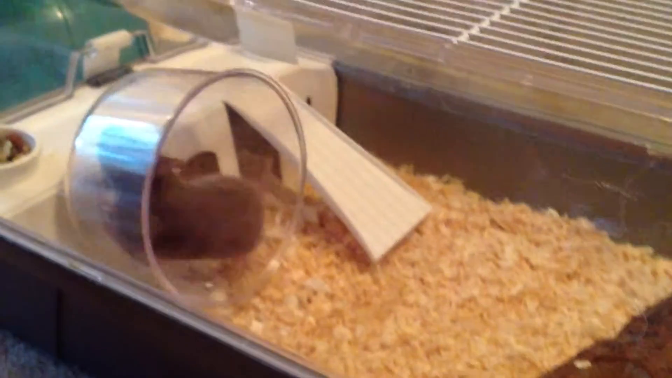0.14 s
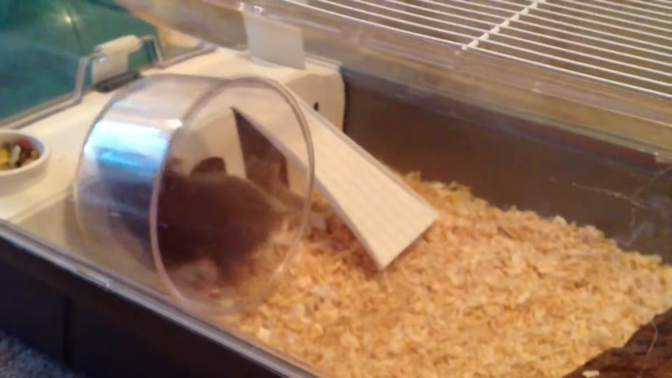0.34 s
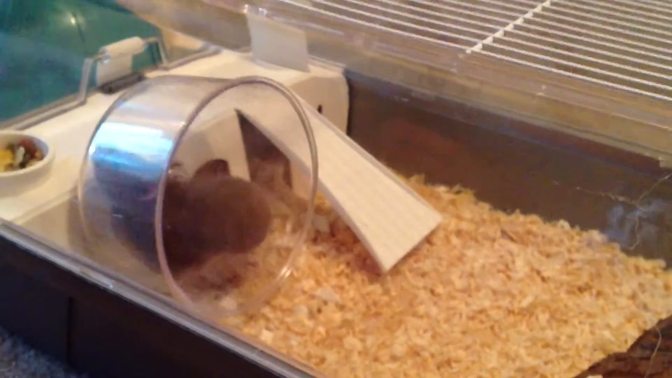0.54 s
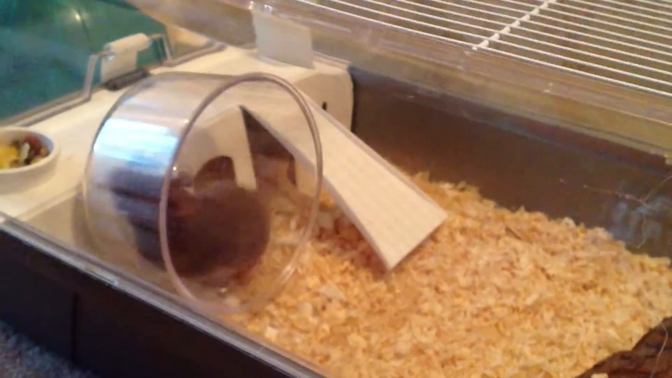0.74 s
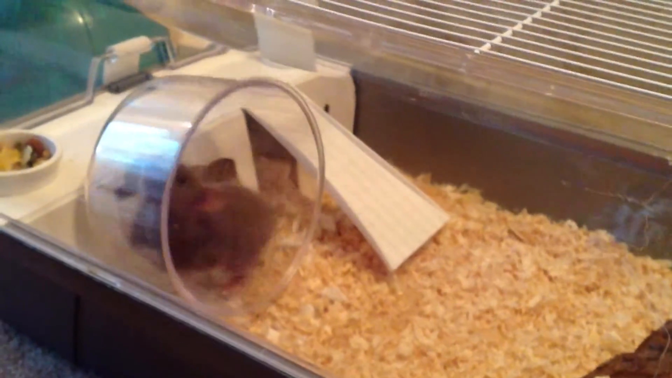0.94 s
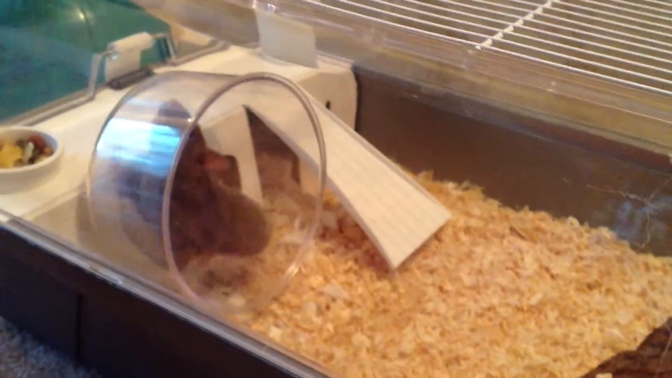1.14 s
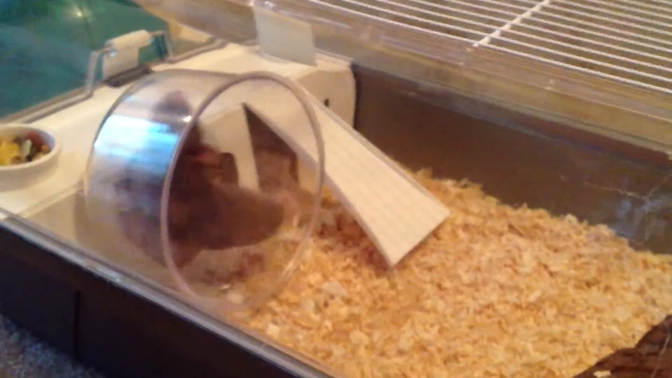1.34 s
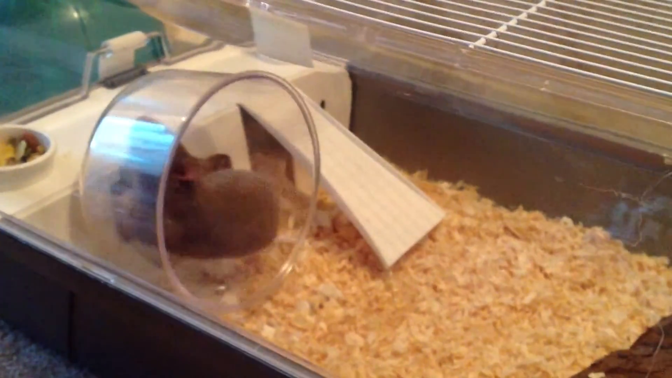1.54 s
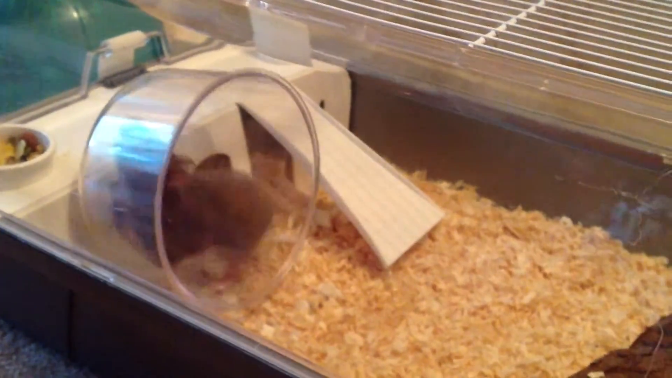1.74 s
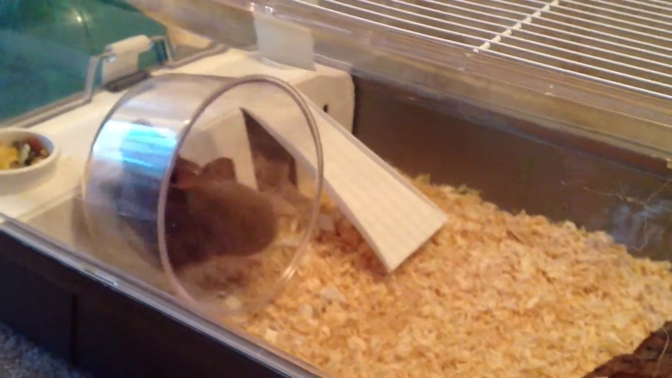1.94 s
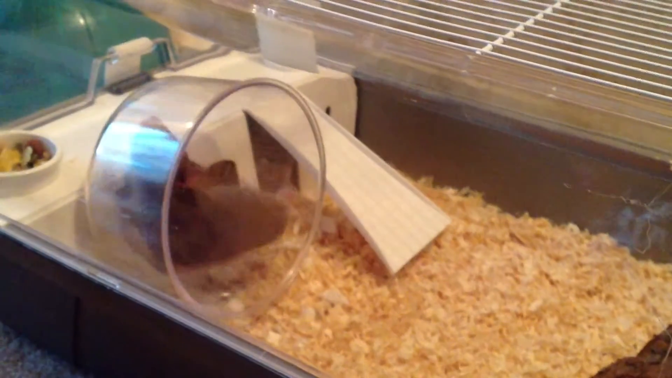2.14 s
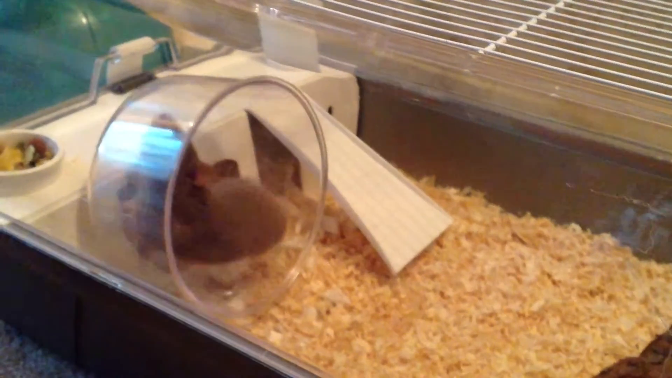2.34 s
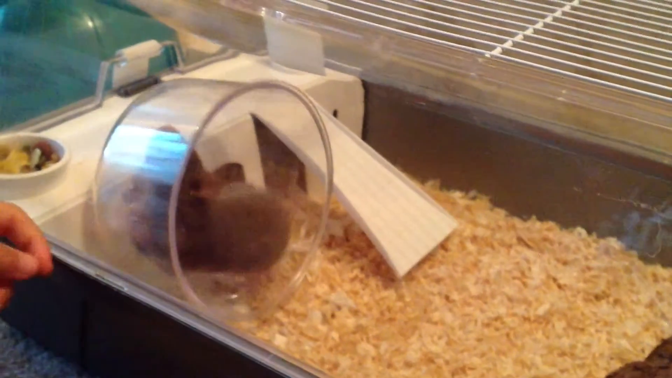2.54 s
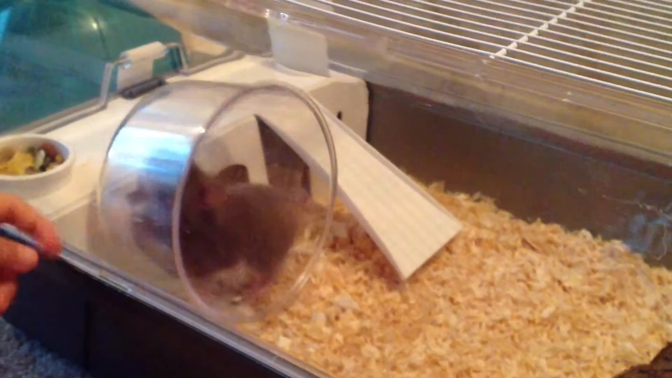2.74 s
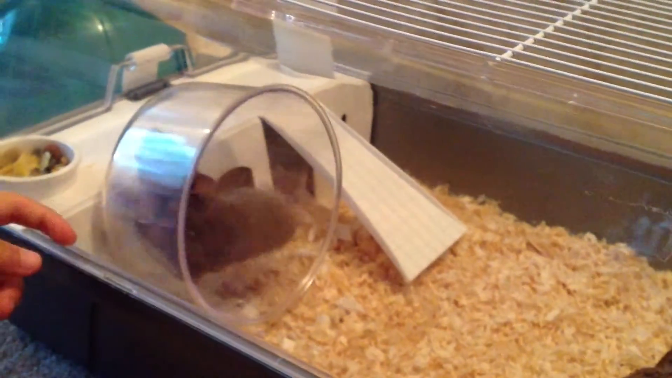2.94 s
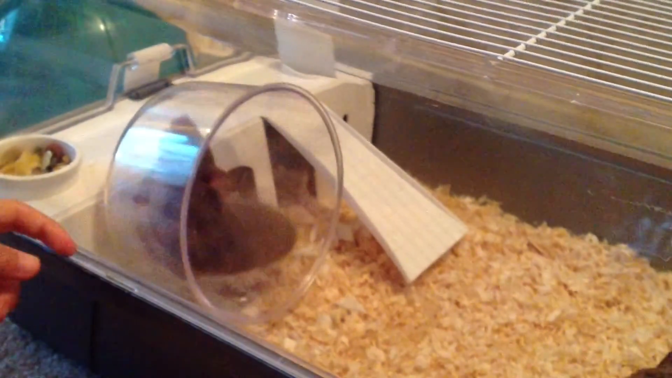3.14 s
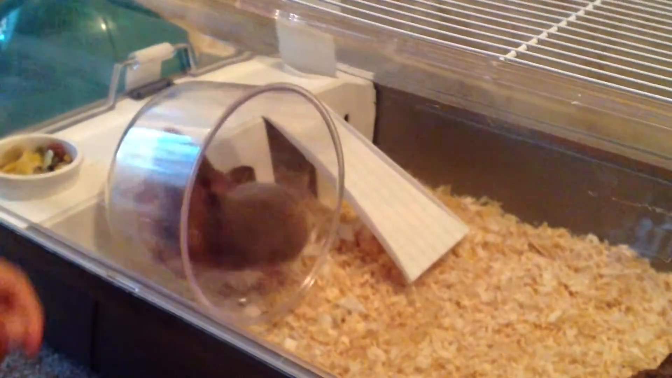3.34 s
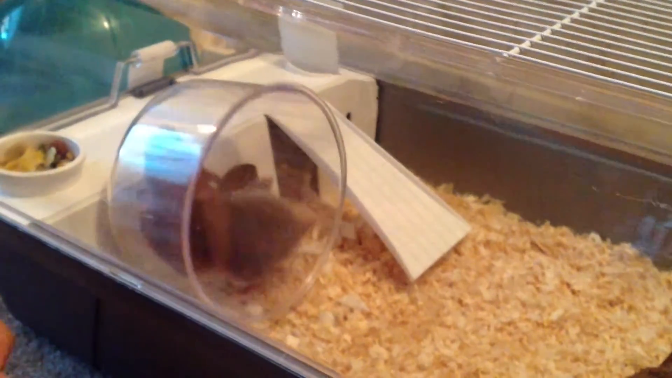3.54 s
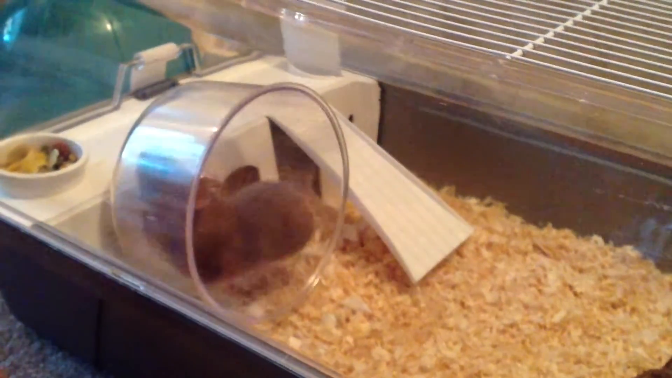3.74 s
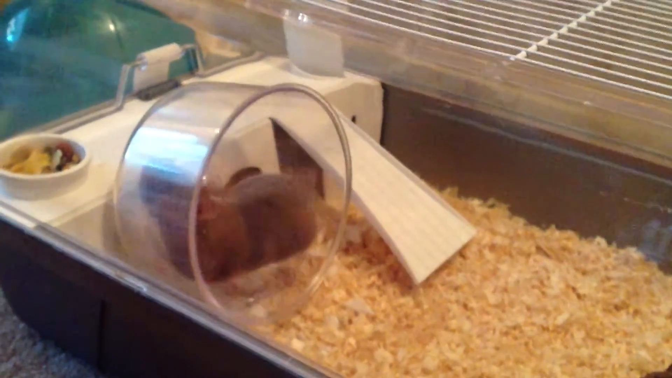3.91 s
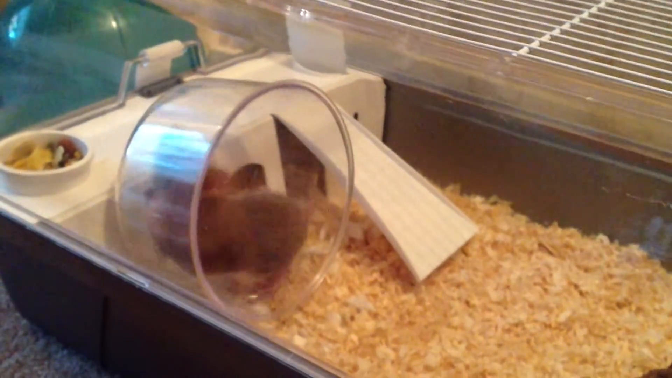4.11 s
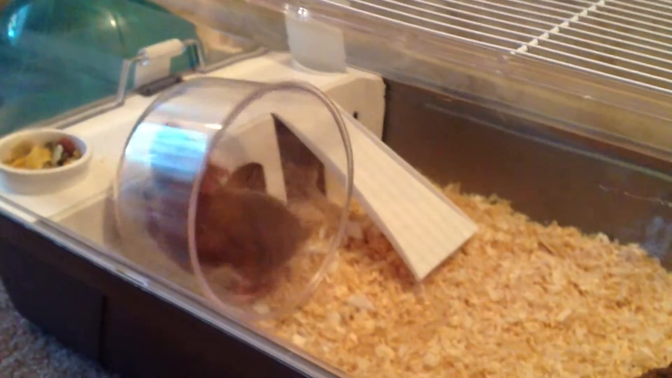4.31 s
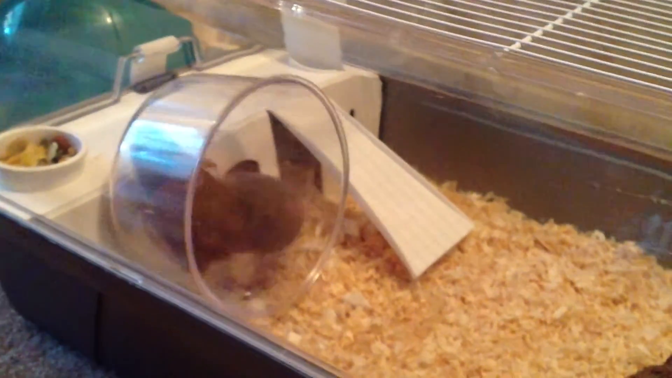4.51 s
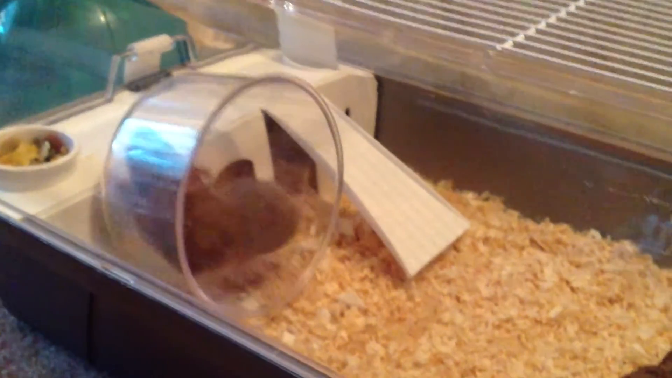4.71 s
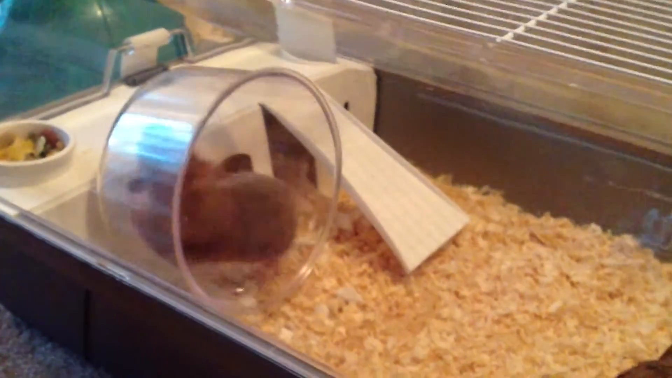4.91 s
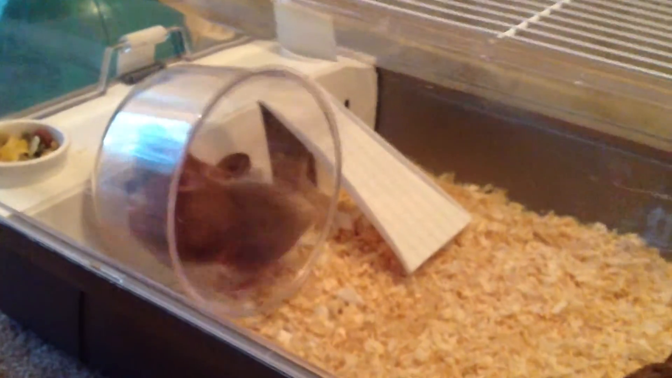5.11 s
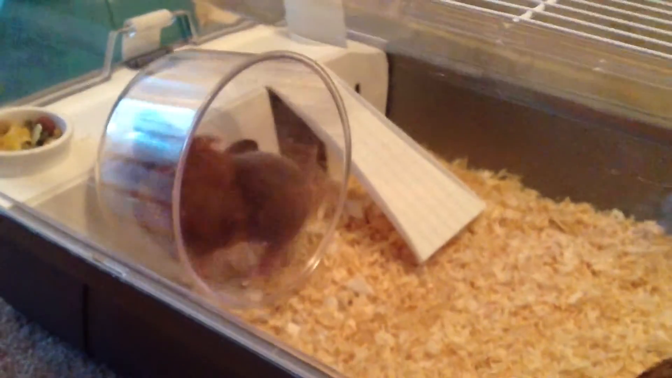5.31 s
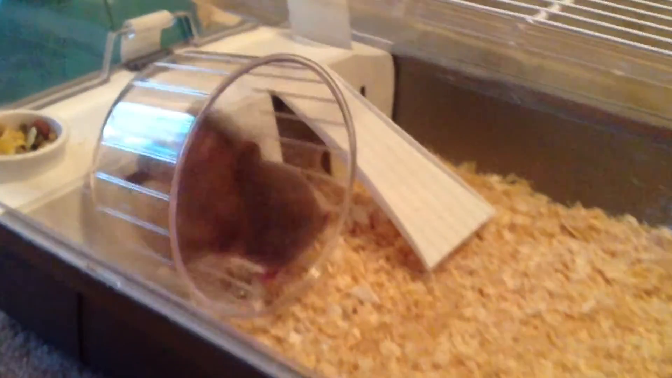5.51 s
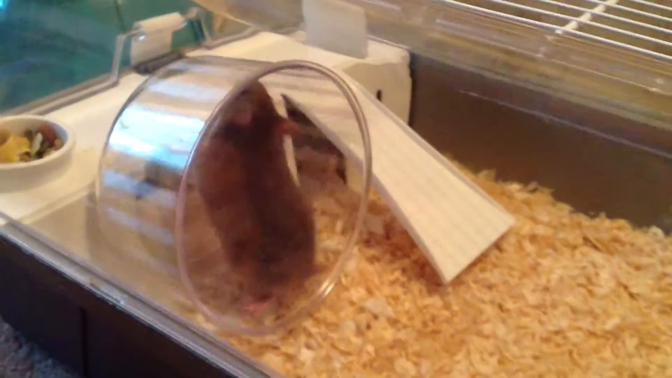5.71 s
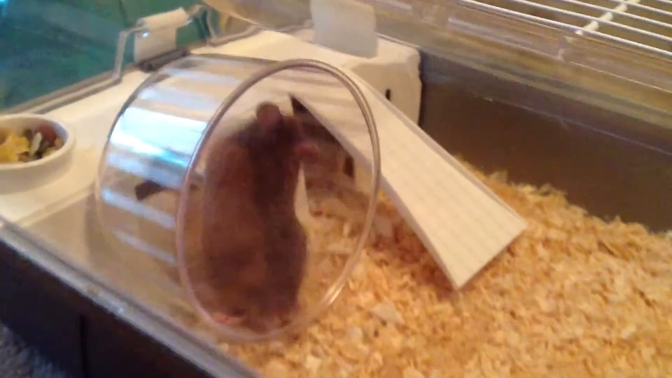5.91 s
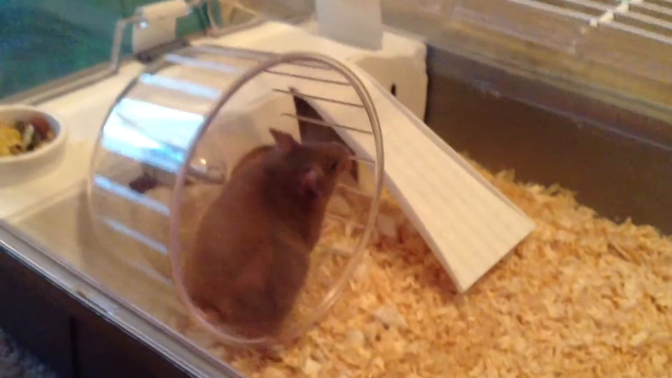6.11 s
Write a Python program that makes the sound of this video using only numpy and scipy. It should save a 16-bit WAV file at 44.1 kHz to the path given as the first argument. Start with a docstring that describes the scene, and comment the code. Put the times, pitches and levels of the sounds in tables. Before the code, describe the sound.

Quick, uneven muffled paw thumps drum inside a rolling plastic wheel, clicking and squeaking at its axle, then stop, leaving quiet room noise.

```python
"""Hamster in a running wheel

A hamster runs in a plastic wheel in a cage in a quiet room; the last footfall comes near 5.4 s.
Paws thump (sinking pulses plus drum modes) and scuff (shaped noise); the turning drum rumbles.
The axle taps, clacks (noise and hub modes) and chirps (gliding stick-slip tones); claws, fur and shavings
tick and rustle. Behind: a steady noise floor, a hiss that swells and fades, a slightly wavering hum."""
import sys
import numpy as np
from scipy import signal
from scipy.fft import rfft, irfft, next_fast_len
from scipy.io import wavfile

SR = 44100
rng = np.random.default_rng(int(sys.argv[2]) if len(sys.argv) > 2 else 0)


def store_wav(level_fs):
    """Save 16-bit WAV to argv[1]."""
    pcm = np.round(np.clip(np.atleast_2d(level_fs), -1, 1) * 32767)
    wavfile.write(sys.argv[1], SR, pcm.T.astype(np.int16))


N = 271656
TIME = np.arange(N) / SR


def amp(db):
    """Linear gain of a level in dB."""
    return 10 ** (np.asarray(db) / 20)


def evened(x):
    """Scale to rms 1."""
    return x / np.sqrt(np.mean(x ** 2) + 1e-20)


def read(points, hz):
    """Interpolate rows of (f/Hz, value) over log frequency."""
    f, value = np.transpose(points)
    return np.interp(np.log(hz + 1), np.log(f + 1), value)


def curve(rows):
    """Gain over time from rows of (t/s, level/dB)."""
    return amp(np.interp(TIME, *np.transpose(rows)))


def add(mix, s, sound):
    """Mix a sound in from time s, cropped to the scene."""
    start = round(s * SR)
    part = mix[max(start, 0):][:len(sound) + min(start, 0)]
    part += sound[max(-start, 0):][:len(part)]


def noise(gain, size=N):
    """Noise of rms 1 whose spectrum is gain(f)."""
    full = next_fast_len(size)
    spectrum = rfft(rng.standard_normal(full)) * gain(np.fft.rfftfreq(full, 1 / SR))
    return evened(irfft(spectrum, full)[:size])


def band(hz, octaves, size=16384):
    """Noise of rms 1 in a bell-shaped band; octaves is its standard deviation."""
    return noise(lambda f: np.exp(-.5 * (np.log2((f + 1) / hz) / octaves) ** 2), size)


def drift(hz):
    """Slow random fluctuation of rms 1, lowpassed at hz."""
    return noise(lambda f: 1 / (1 + (f / hz) ** 4))


def bell(t, length):
    """Smooth swell around t = 0, down to 1/e^2 at +-length."""
    return np.exp(-np.minimum(2 * (t / length) ** 2, 20))


def ringing(modes, t):
    """Sum of decaying modes in random phases."""
    phases = np.exp(2j * np.pi * rng.random(len(modes)))
    decays = np.array([amp(db - 60 * np.maximum(t, 0) / t60) * np.exp(2j * np.pi * hz * t)
                       for hz, db, t60 in modes])
    return (phases @ decays).real


# modes of the drum on its stand: f/Hz, relative level/dB, t60/s
DRUM_MODES = [(122, 3, 0.22), (146.9, 7, 0.53), (176.3, 8.5, 0.28), (207.25, 9, 0.27), (244.5, -10.5, 0.31),
              (281, -1.5, 0.27), (378.4, -6, 0.26), (447, -23, 0.23)]
# paw landings in uneven clusters: t/s, level/dB, f/Hz, length/s
FOOTFALLS = [(0.038, -43.5, 179, 0.012), (0.066, -45, 180, 0.011), (0.146, -40.5, 200, 0.0088),
             (0.3, -55, 203, 0.014), (0.443, -40, 183, 0.013), (0.459, -41, 191, 0.0041),
             (0.492, -45, 226, 0.033), (0.52, -40.5, 184, 0.013), (0.543, -43, 203, 0.0069),
             (0.564, -39.5, 177, 0.012), (0.605, -50.5, 168, 0.014), (0.652, -47.5, 164, 0.014),
             (0.693, -40.5, 203, 0.017), (0.715, -34.5, 189, 0.01), (0.758, -41.5, 202, 0.031),
             (0.82, -41.5, 160, 0.012), (0.843, -39, 180, 0.011), (0.875, -48.5, 180, 0.014),
             (1.006, -36.5, 206, 0.012), (1.042, -46.5, 175, 0.008), (1.29, -34, 184, 0.0069),
             (1.313, -43.5, 181, 0.008), (1.477, -38, 191, 0.02), (1.497, -34.5, 186, 0.01),
             (1.517, -36.5, 175, 0.016), (1.551, -30.5, 182, 0.0072), (1.576, -35, 187, 0.005),
             (1.6, -40, 166, 0.0078), (1.745, -34.5, 187, 0.0064), (1.772, -35, 175, 0.011),
             (1.794, -37, 158, 0.014), (1.837, -31.5, 190, 0.0064), (1.866, -41, 184, 0.032),
             (1.894, -41, 180, 0.0082), (1.921, -40.5, 174, 0.015), (1.976, -37, 208, 0.01),
             (2.0, -45, 171, 0.019), (2.036, -41.5, 170, 0.011), (2.077, -30, 205, 0.014),
             (2.116, -51, 190, 0.028), (2.272, -45, 205, 0.017), (2.329, -32.5, 201, 0.0089),
             (2.365, -47, 172, 0.02), (2.41, -53, 160, 0.031), (2.586, -27.5, 203.5, 0.009),
             (2.62, -33, 172, 0.019), (2.65, -43, 174, 0.0076), (2.75, -42.5, 210, 0.0057),
             (2.783, -44, 198, 0.0082), (2.815, -33.5, 203, 0.013), (2.892, -37.5, 191, 0.0081),
             (3.0, -38.5, 196, 0.0069), (3.021, -36, 200, 0.022), (3.059, -39, 200, 0.014),
             (3.097, -32, 214, 0.007), (3.161, -39.5, 180, 0.0086), (3.274, -37, 186, 0.014),
             (3.334, -35, 208, 0.011), (3.35, -32.5, 190, 0.0077), (3.54, -35, 186, 0.016),
             (3.568, -34, 196, 0.0067), (3.604, -41.5, 195, 0.0072), (3.628, -32, 195, 0.0057),
             (3.662, -41.5, 173, 0.035), (3.681, -34, 201, 0.022), (3.708, -39, 188, 0.0056),
             (3.807, -37, 203, 0.0084), (3.833, -41, 212, 0.0061), (3.878, -35, 185, 0.0081),
             (3.897, -35, 190, 0.017), (3.922, -38, 188, 0.0054), (3.941, -37, 198, 0.024),
             (3.968, -32, 188, 0.0065), (3.994, -39.5, 173, 0.0054), (4.254, -41.5, 199, 0.0071),
             (4.322, -37.5, 178, 0.021), (4.377, -47, 195, 0.009), (4.394, -34, 208, 0.014),
             (4.42, -41, 187, 0.009), (4.467, -43, 153.8, 0.015), (4.577, -35, 188, 0.011),
             (4.604, -37.5, 216, 0.012), (4.635, -27, 208, 0.0052), (4.666, -32.5, 183, 0.0076),
             (4.7, -29, 204, 0.011), (4.733, -41, 178, 0.012), (4.748, -50, 170, 0.0048),
             (4.889, -45, 188, 0.0089), (4.904, -32, 188, 0.0075), (4.945, -30.5, 182, 0.013),
             (4.974, -39.5, 174, 0.013), (4.991, -47, 178, 0.0062), (5.008, -35.5, 175, 0.0093),
             (5.039, -39.5, 183, 0.029), (5.084, -39.5, 187, 0.021), (5.134, -35.5, 200, 0.0075),
             (5.161, -31, 188, 0.0097), (5.201, -34.5, 179, 0.021), (5.231, -40, 172, 0.0077),
             (5.25, -46, 174, 0.0089), (5.3, -46, 154, 0.033), (5.365, -43, 178, 0.0064),
             (5.43, -47.5, 175, 0.0065)]
THUMP_SAG_HZ_PER_S = 850


def footfalls(ring_db=-20.02, radiate_hz=92):
    """Each paw flexes the drum for a few sinking cycles and leaves it ringing; it radiates no deep bass."""
    out, t = np.zeros(N), np.arange(-SR // 25, SR // 4) / SR
    for s, db, hz, length in FOOTFALLS:
        push = bell(t, length) * np.cos(2 * np.pi * (hz - THUMP_SAG_HZ_PER_S * t / 2) * t)
        build = np.clip(t / length, 0, 1)  # the modes take over as the foot lets go
        add(out, s + t[0], amp(db) * (push + amp(ring_db) * build * ringing(DRUM_MODES, t)))
    return signal.sosfiltfilt(signal.butter(3, radiate_hz, "high", fs=SR, output="sos"), out)


# strides, about four a second with a few hurried ones between: t/s, scuff level/dB
STRIDES = [(0.145, -67), (0.459, -66), (0.715, -62.5), (0.844, -68), (1.008, -69), (1.291, -78),
           (1.498, -74), (1.549, -56), (1.772, -69), (1.835, -55.5), (1.974, -64), (2.076, -56),
           (2.331, -52.5), (2.587, -55), (2.811, -63), (3.02, -70), (3.092, -54), (3.274, -58),
           (3.351, -55.5), (3.627, -55), (3.896, -54.5), (4.322, -72), (4.394, -52.5), (4.637, -55),
           (4.902, -58), (5.14, -70), (5.16, -55.5)]
# colour of a foot sliding on plastic: f/Hz, relative level/dB
SCUFF_COLOUR = [(200, -35), (320, 9), (380, 6), (450, 4), (540, -1.5), (800, -4.5), (1100, -13.5),
                (1400, -12.5), (1700, -9), (2000, -15.5), (3200, -9.5), (5000, -45), (7000, -48),
                (15000, -27)]
PAW_SCUFF_DB = -27.5  # relative to the thump


def scuffs(lead_s=0.004, length_s=0.02, grain_db=1.5, grain_hz=91):
    """Sliding friction noise: a little as each paw lands, much more at the push of a stride."""
    slides, t = np.zeros(N), np.arange(-SR // 10, SR // 10) / SR
    landings = [(s, db + PAW_SCUFF_DB) for s, db, _, _ in FOOTFALLS]
    for s, db in STRIDES + landings:
        add(slides, s + t[0], amp(db) * bell(t + lead_s, length_s))
    friction = noise(lambda f: amp(read(SCUFF_COLOUR, f)))
    return slides * friction * amp(grain_db * drift(grain_hz))


# wire stand and bars, resonances: f/Hz
WIRE_HZ = [2128, 2195, 2272, 3120, 3240, 3932, 4240, 4530, 4760, 6000]
# the same resonances in order: width/Hz, level over a flat base/dB
WIRE_SHAPES = [(25.5, 10), (26, 7.5), (24, 12), (45, 10), (50, 9), (35, 14), (32.3, 18.5), (44.5, -4),
               (70.6, 16), (70.6, 19)]


def wires(f):
    """Gain of the wire resonances over a flat base."""
    return 1 + sum(amp(db) / (1 + (2 * (f - hz) / width) ** 2)
                   for hz, (width, db) in zip(WIRE_HZ, WIRE_SHAPES))


# course of the wheel's rumble, relative: t/s, level/dB
ROLL = [(0.0, -55.5), (0.6, -54), (1.1, -62.5), (1.8, -49), (2.6, -58), (3.8, -50.5), (4.5, -47.5),
        (5.15, -48.5), (5.4, -59.5), (5.52, -80), (6.16, -65)]
# colour of axle rubbing, also of the claw ticks: f/Hz, relative level/dB
AXLE_COLOUR = [(1200, -85), (2100, 6), (3000, 4), (4500, 2.5), (5300, -7.5), (8000, -6)]


def rolling(rumble_db=-2, axle_db=-70, axle_follow=0.43, grain_db=3, grain_hz=30,
            load_s=0.057, load_lag_s=0.018, unloaded=0.59):
    """The turning drum rumbles in its modes, most while paws load it; the axle rubs faintly with it."""
    speed, load, t = curve(ROLL), np.zeros(N), np.arange(-SR // 5, SR // 5) / SR
    for s, _, _, _ in FOOTFALLS:
        add(load, s + t[0], bell(t - load_lag_s, load_s))
    rumble = noise(lambda f: sum(amp(db) / (1 + ((f - hz) * t60 / 3.2) ** 2)
                                 for hz, db, t60 in DRUM_MODES))
    rumble = rumble * (unloaded + (1 - unloaded) * np.tanh(load))
    rub = noise(lambda f: amp(read(AXLE_COLOUR, f)) * wires(f)) * amp(grain_db * drift(grain_hz))
    rub_level = amp(axle_db) * (speed / speed.mean()) ** axle_follow
    return amp(rumble_db) * speed * rumble + rub_level * rub


TAP_LEAD_S, TAP_OVER_SCUFF_DB, TAP_HZ, TAP_OCTAVES = 0.015, -4, 4750, 0.35
TAP_RISE_S, TAP_DECAY_S = 0.00059, 0.016


def taps():
    """The wheel rocks and taps its axle just ahead of every stride, harder when the foot scuffs harder."""
    out, t = np.zeros(N), np.arange(16384) / SR
    shape = (1 - np.exp(-t / TAP_RISE_S)) * np.exp(-t / TAP_DECAY_S)
    for s, scuff_db in STRIDES:
        add(out, s - TAP_LEAD_S, amp(scuff_db + TAP_OVER_SCUFF_DB) * band(TAP_HZ, TAP_OCTAVES) * shape)
    return out


# clacks and light knocks of the wheel on its axle: t/s, level/dB
CLACKS = [(0.047, -66), (0.134, -56), (0.418, -56), (0.487, -54.5), (0.511, -62), (0.677, -54.5),
          (0.754, -61), (0.808, -62), (0.997, -60), (1.487, -52), (1.805, -51), (2.0607, -30.5),
          (2.77, -54.5), (2.963, -57.5), (2.989, -55), (3.07, -40.5), (3.319, -54), (3.479, -58),
          (3.8, -53), (3.882, -54.5), (4.044, -54), (4.292, -54), (4.6265, -31.5), (4.932, -54.5)]
# modes of the plastic hub: f/Hz, relative level/dB, t60/s
HUB_MODES = [(2330, -5.5, 0.03), (2740, -1.5, 0.02), (3110, 2, 0.024), (3990, -3, 0.021), (4240, -5, 0.024),
             (4870, -5.5, 0.026)]
CLACK_HZ, CLACK_OCTAVES, CLACK_PEAK_S, CLACK_LENGTH_S = 3150, 0.3, 0.0035, 0.0045


def clacks(ring_db=-4.5, rise_s=0.0007, crack_db=-5.5, ring_build_s=0.002):
    """The hub chatters on the axle for a few milliseconds: a dense crack, and its modes ring briefly."""
    out, t = np.zeros(N), np.arange(16384) / SR
    for s, db in CLACKS:
        ring = ringing(HUB_MODES, t) * (1 - np.exp(-t / ring_build_s))
        crack = band(CLACK_HZ, CLACK_OCTAVES) * bell(t - CLACK_PEAK_S, CLACK_LENGTH_S)
        clack = amp(ring_db) * ring + amp(crack_db) * crack
        add(out, s, amp(db) * (1 - np.exp(-t / rise_s)) * clack)
    return out


# short axle chirps: peak t/s, level/dB, f/Hz, glide/(octaves/s), length/s
CHIRPS = [(0.356, -57, 2480, -4.5, 0.013), (0.433, -57, 4100, -3, 0.0055),
          (0.815, -52, 1050, -19.5, 0.0027), (1.275, -58.5, 2440, -3, 0.013),
          (1.824, -53.5, 2430, -2, 0.0086), (1.875, -43, 4720, -13.5, 0.004),
          (1.885, -40.5, 4340, -5.5, 0.0095), (2.073, -47.5, 5920, -6.5, 0.0044),
          (2.098, -52, 3150, -1.5, 0.005), (2.751, -54, 2200, 1.5, 0.006), (3.436, -56, 974, 12.5, 0.0043),
          (3.502, -55, 2540, 3, 0.019), (3.619, -56.5, 5990, -1, 0.0078), (4.032, -55, 2450, 0, 0.0079),
          (4.113, -57, 4270, 6, 0.007), (4.122, -55, 5230, 7, 0.015), (4.44, -53, 4320, -9.5, 0.0075),
          (4.6305, -30.5, 2180, -3, 0.005), (4.643, -32.5, 2145, 0.5, 0.0047),
          (4.673, -54, 3170, -5, 0.0093), (4.825, -49, 4720, -20.5, 0.0037),
          (4.8291, -31, 4320, -6.5, 0.0075), (4.838, -47, 4540, -12, 0.0041), (4.866, -48, 4320, 0, 0.0039),
          (5.131, -58, 5900, 6, 0.005), (5.151, -51.5, 6000, -4, 0.0066), (5.202, -38, 4690, -7, 0.0045),
          (5.2065, -31.5, 4173, -4, 0.0055), (5.606, -44.5, 3190, 1.5, 0.0073), (5.61, -62, 8700, 2, 0.013),
          (5.611, -62, 2210, -1, 0.014)]
# grip chatter shakes pitch and level
CHATTER_HZ, CHATTER_OCTAVES, CHATTER_DEPTH = 230, 0.7, 0.15
# pitch jitter as a share of pitch, and its growth per dB below the hardest: light slips are rougher
CHIRP_JITTER, CHIRP_JITTER_PER_DB = 0.023, 0.0005


def chirps(octave_db=-9.5, third_db=-27):
    """Axle stick-slip: a brief, rough gliding tone; hard ones bring out their overtones."""
    out, t = np.zeros(N), np.arange(-SR // 25, SR // 25) / SR
    hardest = max(row[1] for row in CHIRPS)
    for s, db, hz, glide, length in CHIRPS:
        jitter = CHIRP_JITTER + CHIRP_JITTER_PER_DB * (hardest - db)
        pitch = hz * 2 ** (glide * t) * (1 + jitter * band(CHATTER_HZ, CHATTER_OCTAVES, size=len(t)))
        phase = 2 * np.pi * np.cumsum(pitch) / SR
        grip = bell(t, length) * (1 + CHATTER_DEPTH * band(CHATTER_HZ, CHATTER_OCTAVES, size=len(t)))
        overtones = amp(octave_db) * np.sin(2 * phase) + amp(third_db) * np.sin(3 * phase)
        tone = np.sin(phase) + amp((db - hardest) / 2) * grip * overtones
        add(out, s + t[0], amp(db) * grip * tone)
    return out


def claws(claw_db=-60, per_s=28, spread_db=3):
    """Tiny random claw ticks on the plastic, thinning to a tenth as the wheel stops."""
    chance, size = rng.random(N), np.minimum(rng.exponential(1, N), 3)
    running = np.interp(TIME, [5.2, 5.5], [1, .1])
    touches = (chance < running * per_s / SR) * amp(claw_db + spread_db * size)
    t = np.arange(512) / SR
    tick = noise(lambda f: amp(read(AXLE_COLOUR, f)), size=len(t)) * np.exp(-t / 0.00064)
    return signal.oaconvolve(touches, tick)[:N]


# single rustles and rough scrapes: peak t/s, level/dB, centre f/Hz, width/octaves, length/s
RUSTLES = [(0.047, -57, 7900, 1.5, 0.0074), (1.265, -58, 7000, 2.6, .008), (1.28, -62.5, 3070, 0.27, 0.022),
           (1.882, -46, 3620, 0.28, 0.0055), (1.989, -59, 10000, 0.68, 0.0093),
           (2.552, -57, 8950, 0.35, 0.011), (2.775, -54, 645, 0.74, 0.012), (2.789, -60, 6000, 3.1, 0.027),
           (3.071, -57.5, 11000, 0.45, 0.0093), (3.073, -54, 4100, 0.2, 0.006),
           (3.259, -60, 8000, 1.3, 0.012), (3.605, -58.5, 9000, 5.5, 0.045),
           (3.93, -56.5, 7500, 1.5, 0.011), (4.659, -60, 3460, 0.41, 0.015),
           (4.825, -63, 3450, 0.15, 0.0064), (5.202, -49, 3580, 0.2, 0.0032),
           (5.211, -48.5, 4330, 0.12, 0.014), (5.595, -63, 2580, 0.51, 0.019),
           (5.834, -70.5, 3130, 0.041, 0.2), (6.103, -58, 8100, 1.4, 0.012)]
SWISH_LEAD_S, SWISH_OVER_SCUFF_DB, SWISH_HZ, SWISH_OCTAVES, SWISH_S = 0.028, -7.5, 10500, 0.96, 0.0088


def rustles():
    """Noise swishes of fur and shavings: a faint one ahead of every stride, its level following the scuff,
    plus single rustles and rough scrapes."""
    out, t = np.zeros(N), np.arange(-SR // 5, SR // 5) / SR
    swishes = [(s - SWISH_LEAD_S, scuff_db + SWISH_OVER_SCUFF_DB, SWISH_HZ, SWISH_OCTAVES, SWISH_S)
               for s, scuff_db in STRIDES]
    for s, db, hz, octaves, length in swishes + RUSTLES:
        add(out, s + t[0], amp(db) * bell(t, length) * band(hz, octaves, size=len(t)))
    return out


# course of the one creak: t/s, level/dB
CREAK = [(2.787, -67), (2.789, -51.5), (2.808, -46), (2.814, -55), (2.835, -56), (2.845, -86)]
# modes rung by its slips: f/Hz, relative level/dB, t60/s
CREAK_MODES = [(463, -13, 0.022), (870, 0.5, 0.014), (1250, -2.5, 0.021), (1920, -14, 0.0055),
               (3200, -8, 0.005)]


def creak(per_s=400, uneven=0.31):
    """The plastic stand creaks: a quick run of slips, uneven in spacing and strength, rings it."""
    out, t = np.zeros(N), np.arange(2048) / SR
    slip = sum(amp(db - 60 * t / t60) * np.sin(2 * np.pi * hz * t) for hz, db, t60 in CREAK_MODES)
    knots, levels = np.transpose(CREAK)
    times = np.arange(knots[0], knots[-1], 1 / per_s)
    for s, (late, force) in zip(times, rng.standard_normal((len(times), 2))):
        level = amp(np.interp(s, knots, levels)) * (1 + uneven * force)
        add(out, s + uneven * late / per_s, level * slip)
    return out


SNAP_S, SNAP_DB, SNAP_HZ, SNAP_DECAY_S = 1.6569, -43, 2750, 0.0012


def snap():
    """A wood shaving snaps: one tiny, bright crack that dies within a few cycles."""
    out, t = np.zeros(N), np.arange(512) / SR
    add(out, SNAP_S, amp(SNAP_DB) * np.cos(2 * np.pi * SNAP_HZ * t) * np.exp(-t / SNAP_DECAY_S))
    return out


# dry ticks close by: t/s, level/dB
TICKS = [(1.1498, -40.5), (1.1896, -37.5), (1.2426, -41.5), (2.712, -43), (4.078, -36)]
TICK_PUSH_S, TICK_RISE_S = 0.00023, 0.00006


def ticks():
    """Each tick is a single sharp push of air and its rebound."""
    out, t = np.zeros(N), np.arange(256) / SR
    u = t / TICK_PUSH_S
    pulse = 2 * (u - 1) * np.exp(-u) * (1 - np.exp(-t / TICK_RISE_S))
    for s, db in TICKS:
        add(out, s, amp(db) * pulse)
    return out


def cage(x, ring_db, near_db, near_t60, ring_t60=0.13, flutter_s=0.0071, flutter_db=-16):
    """Sound bounces between the plastic walls, scatters, and sets the wires ringing."""
    t = np.arange(SR // 2) / SR
    late = t > .002
    near = rng.standard_normal(len(t)) * amp(-60 * t / near_t60) * late
    ring = noise(wires, len(t)) * amp(-60 * t / ring_t60) * late
    echo = amp(near_db) * near / np.linalg.norm(near) + amp(ring_db) * ring / np.linalg.norm(ring)
    for bounce in (1, 2):
        echo[round(bounce * flutter_s * SR)] += rng.choice([-1, 1]) * amp(bounce * flutter_db)
    return x + signal.fftconvolve(x, echo)[:N]


# colour of the noise floor: f/Hz, relative level/dB
FLOOR_COLOUR = [(25, -15), (55, -18), (90, -8), (140, 11.5), (200, 8.5), (300, 5.5), (450, 4), (700, -2.5),
                (1000, -5), (2000, -8.5), (3200, -10), (5000, -9.5), (9000, -9), (15000, -9)]
# soft hiss swelling and fading: t/s, level/dB
HISS = [(0, -67), (1.55, -68.5), (1.8, -61), (2.05, -63.5), (2.3, -57.5), (2.55, -61), (2.68, -67),
        (6.16, -67.5)]
# hum partials before the fade: f/Hz, rms level/dB
HUM = [(98, -79), (247, -77), (442, -83), (590.3, -74)]
# gain on the hum: t/s, level/dB
HUM_FADE = [(0, 5), (2.5, 5.5), (5.2, 3.5), (5.7, -1.5), (6.16, -3)]


def room(floor_db=-63.5, hiss_corner_hz=2500, waver_hz=0.94, waver_rate_hz=4.84):
    """Steady shaped noise, a passing hiss and a hum of sines slightly wavering in pitch."""
    floor = amp(floor_db) * noise(lambda f: amp(read(FLOOR_COLOUR, f)))
    hiss = curve(HISS) * noise(lambda f: 1 / np.sqrt(1 + f / hiss_corner_hz))
    hum = np.zeros(N)
    for hz, db in HUM:
        phase = 2 * np.pi * np.cumsum(hz + waver_hz * drift(waver_rate_hz)) / SR
        hum += amp(db) * np.sqrt(2) * np.sin(phase)
    return floor + hiss + curve(HUM_FADE) * hum


def scene():
    """The wheel in its cage and the room around it; knocks and rubbing each scatter and ring the wires."""
    rattle = cage(taps() + clacks() + claws(), ring_db=-11, near_db=-15, near_t60=0.15)
    rubbing = cage(chirps() + rustles(), ring_db=-11, near_db=-10.5, near_t60=0.23)
    wheel = footfalls() + scuffs() + rolling() + rattle + rubbing
    return (wheel + creak() + snap() + ticks() + room())[None]


def record(dry, low_cut_hz=62, edge_hz=15400):
    """A small microphone loses the deep bass; then a lowpass limits the band."""
    f = np.fft.rfftfreq(N, 1 / SR)
    thin = irfft(rfft(dry) * (f ** 2 + 200) / (f ** 2 + low_cut_hz ** 2), N)
    lowpass = signal.firwin(511, edge_hz, window=("kaiser", 9), fs=SR)
    return signal.oaconvolve(thin, lowpass[None], "same")


dry = scene()
out = record(dry)
store_wav(out)
```